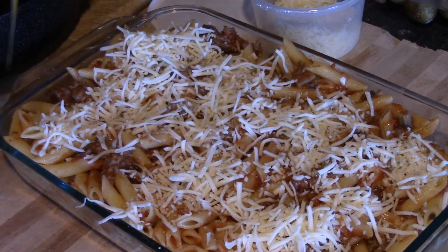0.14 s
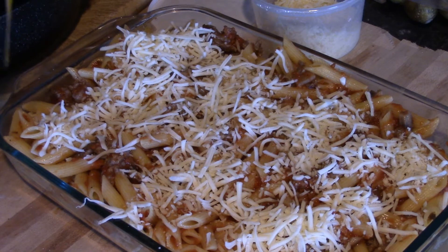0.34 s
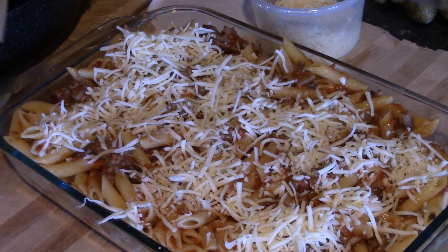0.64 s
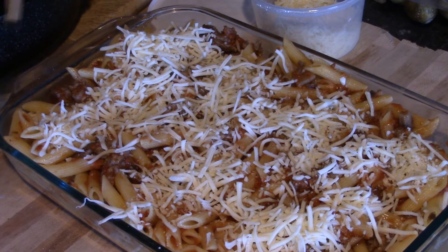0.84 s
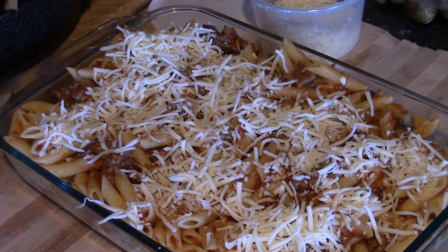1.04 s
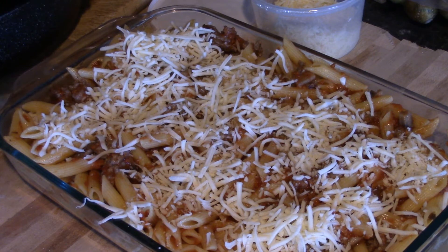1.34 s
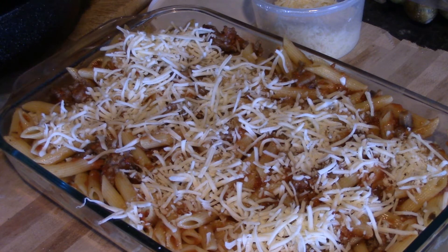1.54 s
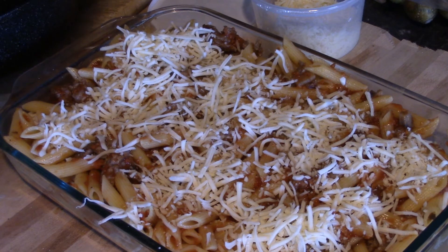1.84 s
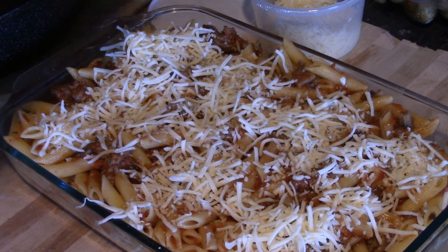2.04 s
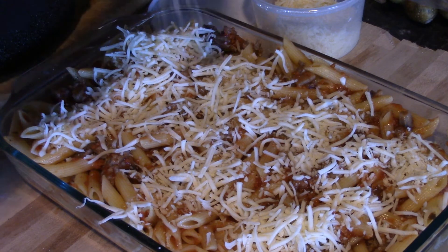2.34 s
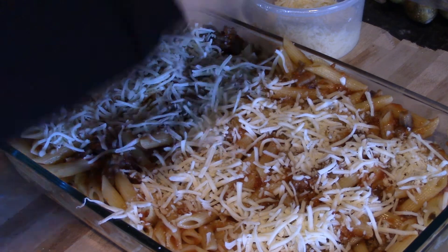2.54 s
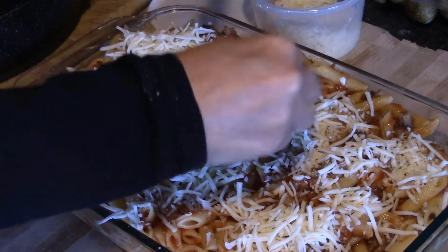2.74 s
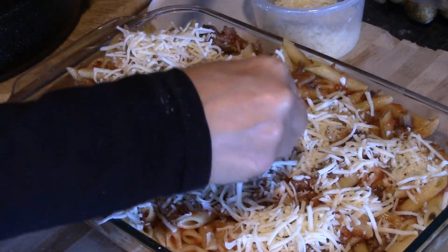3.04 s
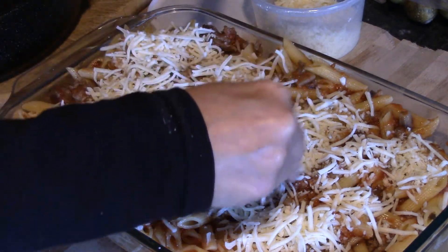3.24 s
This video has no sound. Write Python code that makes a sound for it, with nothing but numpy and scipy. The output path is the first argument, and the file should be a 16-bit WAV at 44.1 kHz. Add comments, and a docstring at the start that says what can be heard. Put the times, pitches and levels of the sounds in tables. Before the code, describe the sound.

A thin plastic bag crackles and rustles sharply up close, then leaves quiet kitchen room tone.

```python
"""In a quiet kitchen, a hand works in a thin plastic bag near a camera: creases snap one by one,
the film rustles between them, then the bag settles and the room tone remains.
A snap is a ping, noise bursts and a crackling tail; the rustle is a swarm of tiny noise grains.
Soft pops are bursts of band noise, echoes are decaying noise, and the room tone is coloured noise."""
import sys
import numpy as np
from scipy import signal
from scipy.fft import rfft, irfft
from scipy.io import wavfile
from scipy.ndimage import uniform_filter1d

SR = 44100
rng = np.random.default_rng(int(sys.argv[2]) if len(sys.argv) > 2 else 0)


def inscribe(sig):
    """Save sig as 16-bit PCM at rate SR to the path in sys.argv[1].

    A 1-D sig is mono; a 2-D sig holds one channel per row.
    Samples are clipped to [-1, 1] before scaling.
    """
    pcm = np.round(np.clip(np.atleast_2d(sig).T, -1, 1) * 32767)
    wavfile.write(sys.argv[1], SR, pcm.astype(np.int16))


N = 149940
AIR_DB = -61
ROOM_T60_S, ROOM_DB, ROOM_DULL_HZ, ROOM_LATE_S = 0.28, -17.5, 5350, 0.014
NEAR_T60_S = 0.061
GRAINS_PER_S, GRAIN_T60_S = 1800, 0.008
GRAIN_SCATTER_DB, GRAIN_COLOUR_DB = 7, 5.5
FLURRY_PER_S, FLURRY_DB, OWN_FLURRY_DB = 60, 2.2, 3  # shared by all bands; each band's own
ATTACK_S = 0.00027  # time constant for a length factor of 1
BURST_T60_S, BURST_DB = 0.017, -21.5
RING_DB, RING_WIDTH = 0, 1.106  # band edges lie at the ring frequency divided and multiplied by this ratio
CRACK_T60_S, CRACK_DB = 0.0062, 1.5
THUD_T60_S, THUD_DB, THUD_LATE_S = 0.06, -12.5, 0.002
SETTLE_T60_S, SETTLE_DB = 0.11, -20.5
FLIP_CYCLES, FLIP_DB = 9, -1  # cycles of the ping within a 60 dB decay
BAG_LOW_HZ = 220
POCKET_HZ, POCKET_WIDTH_HZ, POCKET_DB = 1628, 74, -11
BAG_SIDE_DB, CRINKLE_SIDE_DB = -5.5, 4
TOP_HZ = 16300


def amp(db):
    """Level in decibels as an amplitude ratio."""
    return 10 ** (np.asarray(db) / 20)


def unit(x):
    """Normalise to a root-mean-square value of 1."""
    return x / np.sqrt(np.mean(x ** 2))


def fade(t, t60):
    """Exponential decay: 60 dB down after t60 seconds, silent before time zero."""
    return np.exp(-np.log(1000) * np.maximum(t, 0) / t60) * (t >= 0)


def band(x, lo_hz, hi_hz):
    """Band-pass filter that passes the components between two cut-off frequencies."""
    edges_hz = [lo_hz, min(hi_hz, 0.45 * SR)]
    return signal.sosfilt(signal.butter(2, edges_hz, "band", fs=SR, output="sos"), x)


def gain_at(points, hz):
    """Spectral gain: decibels interpolated along logarithmic frequency."""
    p = np.array(points, float)
    return amp(np.interp(np.log(np.maximum(hz, 1)), np.log(p[:, 0]), p[:, 1]))


def colour(x, *tables):
    """Linear filtering: multiply the spectrum by the gain of every table."""
    hz = np.arange(len(x) // 2 + 1) * SR / len(x)
    gain = np.prod([gain_at(p, hz) for p in tables], axis=0)
    return irfft(rfft(x) * gain, len(x))


def walk(rate):
    """Slow random modulation: smoothed random steps, rate per second, of about unit spread."""
    k = max(int(SR / rate), 1)
    steps = np.repeat(rng.standard_normal(N // k + 1), k)
    return unit(uniform_filter1d(steps, k)[:N])


def air():
    """Diffuse field: independent mid and side noises make a wide, wavering room tone, with a thin whine."""
    # Colour of the room tone. Each row: frequency in Hz, relative density in dB per Hz.
    air_spectrum = [(15, -54), (25, -24), (192, -5), (226, -8), (496, -15), (584, -19.5), (1550, -20.5),
                    (1680, -18.5), (2040, -15.5), (13300, -33.5), (16500, -57)]
    # Stereo width of the room tone. Each row: frequency in Hz, side over mid in dB.
    air_width = [(60, -1), (110, -1.5), (200, -1), (380, 4.5), (700, 7), (1290, 2), (2380, -4.5),
                 (4400, -6.5), (8120, -8), (15000, -23.5)]
    # Faint tone. Each row: frequency in Hz, mean level in dB.
    whine_tones = [(1599, -70)]
    mid = colour(rng.standard_normal(N), air_spectrum)
    side = colour(rng.standard_normal(N), air_spectrum, air_width)
    stereo = mid + side * np.array([[1], [-1]])
    tone = stereo / np.std(mid) * amp(AIR_DB + 1.0 * walk(2.7))
    t = np.arange(N) / SR
    for hz, db in whine_tones:
        tone = tone + np.sqrt(2) * amp(db + 1.0 * walk(5.6)) * np.sin(2 * np.pi * hz * t)
    return tone


def echo(x, t60, top_hz, late_s):
    """Diffuse reverberation: convolution with noise that starts late_s on and decays 60 dB in t60."""
    t = np.arange(int(0.6 * SR)) / SR
    tail = band(rng.standard_normal(len(t)), 120, top_hz) * fade(t - late_s, t60)
    return signal.fftconvolve(x, tail / np.sqrt(np.sum(tail ** 2)))[:N]


def rustle():
    """Granular excitation: random tiny creases of varied size and colour drive noise in octave bands."""
    # Course of the rustle. Each row: time in seconds, level in dB, treble and bass in dB relative
    # to the level, grit from 0 (smooth slide) to 1 (crackle).
    rustle_course = [(0, -37, -0.5, 2, 0.2), (.12, -41, 8.5, -5.5, 1), (.25, -45, 4, 2, 0.8),
                     (.33, -46.5, 4, -0.5, 0.2), (.42, -33, -5, -2.5, 0.6), (.55, -34.5, 6, -3.5, 0.48),
                     (.7, -41, 2, 1, 0.83), (.86, -42, -3, -1, 0.32), (1.02, -45, -1.5, 2, 0.27),
                     (1.2, -49.5, 10.5, 5.5, 0.97), (1.34, -47.5, -5, 6, 0.98), (1.46, -45, -5, 3, 0.58),
                     (1.58, -57, 0.5, 6.5, 0.5), (1.709, -37, 2, 0.5, 0.86), (1.76, -47.5, -10, -1.5, 0.64),
                     (1.9, -48.5, 14.5, 5.5, 0.78), (2.01, -47, 8, 3, 0.54), (2.129, -37.5, 12.5, -1, 0.15),
                     (2.24, -42, 8, -3, 0.32), (2.36, -48.5, 11.5, 5.5, 0.3), (2.45, -55, 6, 8.5, 0.5),
                     (2.55, -63, 5, 13.5, 0.06), (2.75, -63.5, 4, 12.5, 0.34), (3.4, -73, 10, 19, 0.43)]
    # Colour of the film. Each row: frequency in Hz, relative density in dB per Hz.
    film_spectrum = [(47, -53), (80, -9.5), (285, -1), (950, -4.5), (1480, 0.5), (2220, -8), (2770, -6),
                     (9870, -24), (14400, -29), (16500, -49)]
    t = np.arange(N) / SR
    columns = np.array(rustle_course, float).T
    level_db, treble_db, bass_db, grit = (np.interp(t, columns[0], v) for v in columns[1:])
    share = np.clip(grit, 0, 1)
    chance, size = rng.random((2, N))
    size_db = -GRAIN_SCATTER_DB * grit * (1 + np.log(size + 0.01))
    hits = (chance < GRAINS_PER_S / SR) * amp(size_db)
    hits = hits * amp(FLURRY_DB * grit * walk(FLURRY_PER_S))
    pole = np.exp(-np.log(1000) / (GRAIN_T60_S * SR))
    out = 0
    for hz in 88 * 2.0 ** np.arange(8):
        grain_db = GRAIN_COLOUR_DB * grit * np.clip(rng.standard_normal(N), -2, 2)
        grains = signal.lfilter([1], [1, -pole], hits * amp(grain_db))
        env = share * unit(grains) + (1 - share)  # the less grit, the more even the hiss
        lean = np.log2(hz / 2500) / 2  # reaches 1 two octaves above, -1 two octaves below
        tilt_db = treble_db * np.clip(lean, 0, 1) + bass_db * np.clip(-lean, 0, 1)
        tilt_db = tilt_db + OWN_FLURRY_DB * np.sqrt(share) * walk(FLURRY_PER_S)
        x = band(env * rng.standard_normal(N), hz / np.sqrt(2), hz * np.sqrt(2))
        out = out + unit(x) * np.sqrt(hz) * amp(tilt_db)  # the root gives equal power per Hz
    out = colour(out, film_spectrum)
    return out / np.std(band(out, 1200, 5000)) * amp(level_db)


def pops():
    """Band-limited noise bursts: soft-edged envelopes give dull pops of the film without a crack."""
    # Each row: start in seconds, level in dB before halving the amplitude, centre frequency in Hz,
    # length in seconds, ratio of each band edge to the centre.
    pop_events = [(0.621, -30.5, 1590, 0.018, 1.47), (1.332, -26.5, 1510, 0.019, 1.47),
                  (1.435, -28, 1170, 0.0089, 1.03), (1.863, -31.5, 1490, 0.011, 1.12),
                  (1.878, -32, 1480, 0.0086, 1.12), (1.908, -27.5, 1460, 0.0082, 1.12),
                  (1.924, -27.5, 1570, 0.013, 1.12), (2.668, -47, 1560, 0.0077, 1.1),
                  (2.942, -42, 1090, .006, 1.4), (3.262, -47, 1060, 0.0035, 2)]
    out = np.zeros(N)
    for s, level_db, hz, length, width in pop_events:
        noise = unit(band(rng.standard_normal(4096), hz / width, hz * width))
        k = int(length * SR)
        burst = noise[-k:] * np.sin(np.pi * np.arange(k) / k) ** 0.21
        i = int(s * SR)
        out[i:i + k] += amp(level_db) * unit(burst) / 2
    return out


def snaps():
    """Impulsive buckling: each crease flips with a ping, a noisy burst, a crack, a thud and a crackling tail."""
    # Each row: start in seconds, level in dB, ring frequency in Hz, treble crack and low thud in dB
    # relative to the level (before CRACK_DB and THUD_DB), length factor.
    snap_events = [(0.014, -16.5, 2500, -6, -36, 0.9), (0.027, -17, 5400, -10.5, -32, 1),
                   (0.059, -16, 1870, 0, -27, 1.6), (0.068, -16.5, 1810, -23, -17.5, 1.7),
                   (0.102, -17, 2310, -25, -26, 1.7), (0.12, -9, 3100, -6, -20.5, 0.94),
                   (0.15, -11.5, 2800, -11, -19.5, 1), (0.164, -3, 5050, -11.5, -24, 0.71),
                   (0.202, -8, 1880, -14, -24, 2), (0.221, -8, 3900, -10.5, -27.5, 1.5),
                   (0.262, -20, 2650, -15, -20, 0.67), (0.275, -23.5, 3580, -12, -19, 1.01),
                   (0.303, -27.5, 3580, -27, -17, 0.84), (0.321, -21, 3150, -11.5, -32, 1),
                   (0.356, -17.5, 2900, -22, -12.5, 0.7), (0.368, -14, 2980, -20, -36, 1.3),
                   (0.375, -5.5, 1730, -15.5, -20.5, 1.9), (0.4, -8.5, 8800, -9, -22, 0.99),
                   (0.408, -15.5, 2880, -31, -19, 1.1), (0.415, -13, 1900, -20, -13, 2.1),
                   (0.42, -17, 1850, -5, -23, 2), (0.43, -12, 2870, -22, -19, 1.2),
                   (0.436, -8.5, 1610, -7.5, -20, 1.8), (0.488, -18.5, 2030, -12, -10, 1.5),
                   (0.517, -22, 4940, -8, -11.5, 0.68), (0.528, -10, 2370, -18, -25, 1),
                   (0.577, -13, 3460, -6, -18.5, 1.3), (0.593, -13.5, 3360, -29, -50, 0.92),
                   (0.619, -18, 1550, -13, -14.5, 2.2), (0.682, -18.5, 3040, -9, -40, 1.1),
                   (0.729, -25.5, 4400, -28, -23, 0.64), (0.777, -22, 1870, -14, -31, 1),
                   (0.791, -18, 1600, -18, -13, 1.4), (0.8, -22, 2930, -10, -21, 1),
                   (0.85, -26.5, 3150, -21, -27, 0.79), (0.883, -31, 2970, -9.5, -22, 1.1),
                   (0.901, -25.5, 1470, -26, -9.5, 0.98), (0.926, -15.5, 1660, -10, -20, 1.8),
                   (1.01, -33.5, 1470, -24, -1, 0.75), (1.05, -20.5, 1650, -8.5, -33, 2.1),
                   (1.091, -25.5, 2900, -11, -31, 1.5), (1.115, -30, 2450, -9, -9, 0.67),
                   (1.133, -15, 2700, -6.5, -14, 1.5), (1.178, -21, 1560, -10.5, -13.5, 1.4),
                   (1.233, -16, 3060, -12, -18.5, 1.3), (1.242, -23, 3200, -14, -25, 1.4),
                   (1.281, -16, 4900, -19, -16.5, 0.88), (1.295, -16.5, 2000, -20, -41, 1.3),
                   (1.305, -26, 2970, -12, -33, 1), (1.324, -17.5, 2150, -25, -22, 1),
                   (1.331, -12.5, 1420, -48, -19.5, 1.06), (1.352, -23.5, 1500, -30, -35, 1.5),
                   (1.365, -17.5, 1450, -23, -17, 1.3), (1.384, -17, 3600, -11.5, -33, 1.2),
                   (1.425, -23, 1550, -7, -15, 0.78), (1.432, -14.5, 3330, -43, -19, 1.1),
                   (1.615, -32.5, 2690, -12, -34, 1.2), (1.636, -12, 2860, -14, -24, 1.26),
                   (1.694, -24, 1470, -18, -31, 1.35), (1.702, -25, 1670, -29, -37, 1.2),
                   (1.769, -17, 2970, -23, -25, 0.6), (1.795, -9.5, 4120, -25.5, -23.5, 1.2),
                   (1.842, -11, 5900, -13.5, -27.5, 0.68), (1.884, -11, 5150, -15, -37, 1.15),
                   (1.91, -22.5, 1410, -9, -27, 1.2), (1.957, -21.5, 4130, -27, -13, 1.3),
                   (2.035, -23.5, 1580, -27, -22, 1.3), (2.189, -21, 2660, -28, -31, 1.9),
                   (2.223, -30, 4500, -4, -30, 1.2), (2.263, -29, 4770, -10, -25, 0.98),
                   (2.416, -40, 7200, -5, -35, 0.62), (2.419, -25.5, 3000, -8, -28, 1.3),
                   (2.488, -38, 1680, -6, -20, 1.5), (2.799, -25.5, 1720, -30, -24, 1.9)]
    size = 8192
    t, out = np.arange(size) / SR, np.zeros(N + size)
    for s, level_db, hz, crack_db, thud_db, long in snap_events:
        n = rng.standard_normal((6, size))
        rise = 1 - np.exp(-t / (ATTACK_S * long ** 2))

        ring = unit(band(n[5], hz / RING_WIDTH, hz * RING_WIDTH))
        wide = unit(band(n[0], 2200, 5030)) + amp(RING_DB) * ring
        body = rise * wide * fade(t, BURST_T60_S * long)
        # the burst's energy grows in proportion to its length
        burst = amp(BURST_DB) * body * np.sqrt(BURST_T60_S * long * SR / np.sum(body ** 2))

        crack_fade = fade(t, CRACK_T60_S * np.sqrt(long)) + amp(SETTLE_DB) * fade(t, SETTLE_T60_S / 2)
        crack = amp(crack_db + CRACK_DB) * unit(band(n[1], 7000, 11500)) * crack_fade

        # noise times squared noise is spiky, so the film keeps crackling after the snap
        tail = unit(band(n[3] * n[4] ** 2, 630, 5100)) * fade(t, SETTLE_T60_S) * amp(SETTLE_DB)

        flip = amp(FLIP_DB) * np.sin(2 * np.pi * hz * t) * fade(t, FLIP_CYCLES / hz) / long
        one = burst + rise * (tail + crack) + flip

        thud = unit(band(n[2] * fade(t - THUD_LATE_S, THUD_T60_S), 220, 800)[:2048])
        one[:len(thud)] += amp(thud_db + THUD_DB) * thud
        i = int(s * SR)
        out[i:i + size] += amp(level_db) * one
    return out[:N]


def scene():
    """Superposition: the bag with its air-pocket resonance, its reflections and the room tone add up."""
    # Width of the bag's sound. Each row: frequency in Hz, side gain in dB (before BAG_SIDE_DB).
    bag_width = [(60, -14), (110, -22), (200, -18), (380, -27), (1290, -25), (2380, -24), (4400, -21),
                 (8120, -15), (13000, -28.5), (16000, -20)]
    low_cut = signal.butter(2, BAG_LOW_HZ, "high", fs=SR, output="sos")
    bag = signal.sosfilt(low_cut, snaps() + pops() + rustle())
    # the air pocket of the bag is rung by all its sounds
    pocket = band(bag, POCKET_HZ - POCKET_WIDTH_HZ / 2, POCKET_HZ + POCKET_WIDTH_HZ / 2)
    bag = bag + amp(POCKET_DB) * pocket
    walls = amp(ROOM_DB) * echo(bag, ROOM_T60_S, ROOM_DULL_HZ, ROOM_LATE_S)
    # the counter nearby reflects a little differently into the two microphones
    counter = echo(bag, NEAR_T60_S, 22000, 0)
    # each snap radiates unevenly: freshly drawn noise at the same instants
    uneven = amp(CRINKLE_SIDE_DB) * snaps()
    side = amp(BAG_SIDE_DB) * colour(counter + uneven, bag_width)
    return bag + walls + side * np.array([[1], [-1]]) + air()


def record(dry):
    """Band limitation: the camera cuts the top with a steep elliptic low-pass filter."""
    return signal.sosfilt(signal.ellip(10, 0.2, 75, TOP_HZ, fs=SR, output="sos"), dry)


dry = scene()
out = record(dry)
inscribe(out)
```